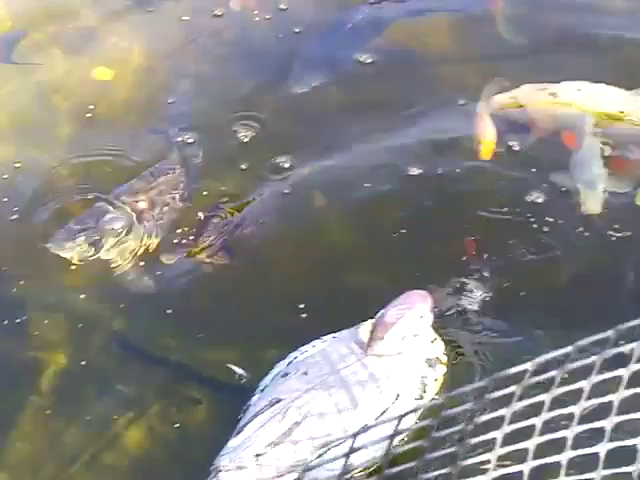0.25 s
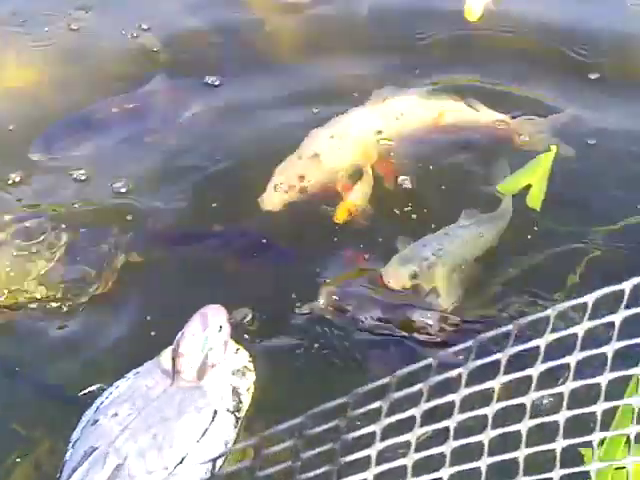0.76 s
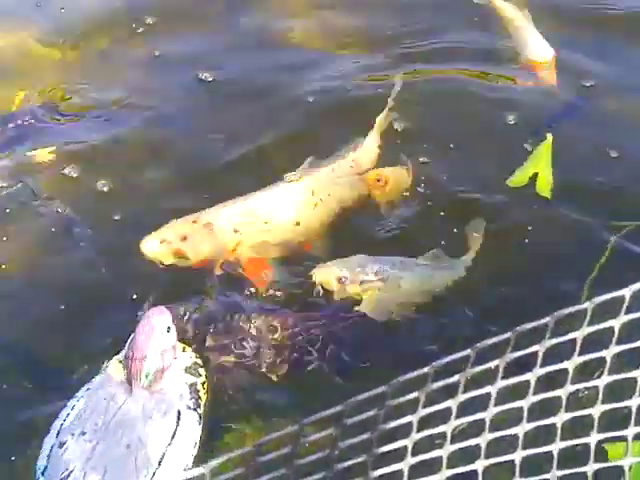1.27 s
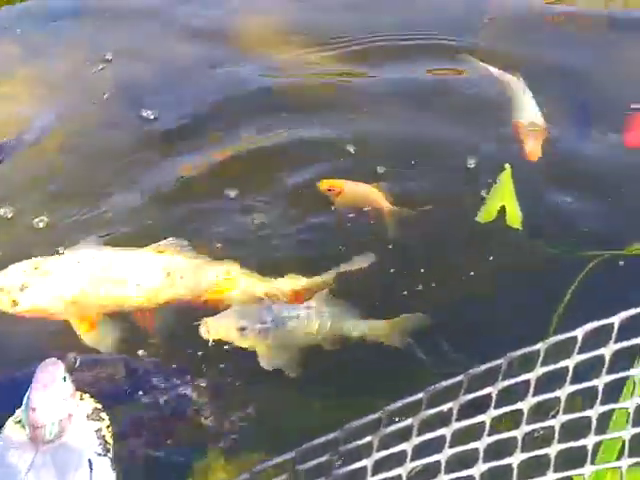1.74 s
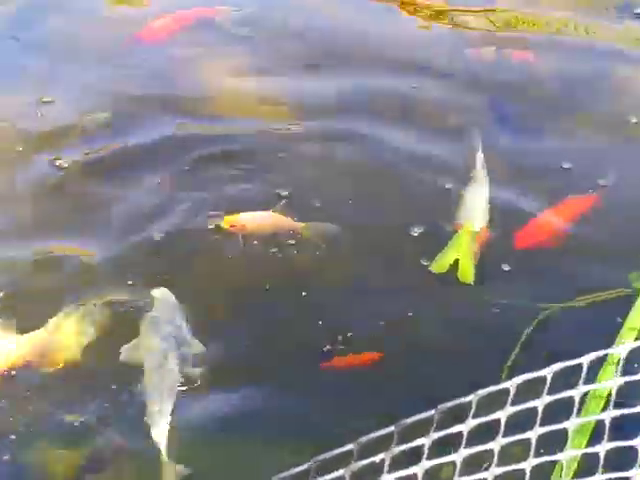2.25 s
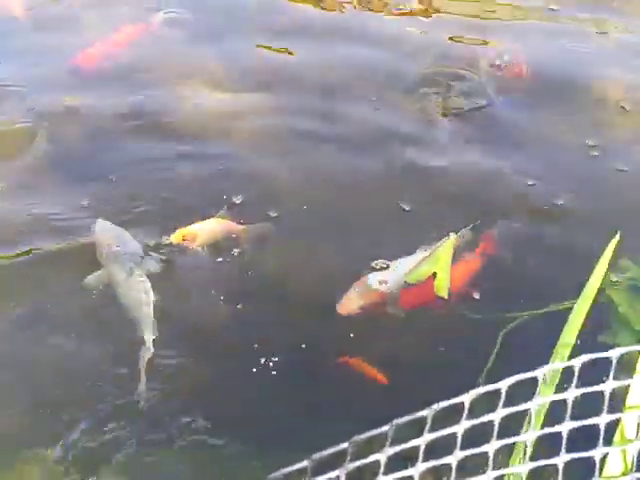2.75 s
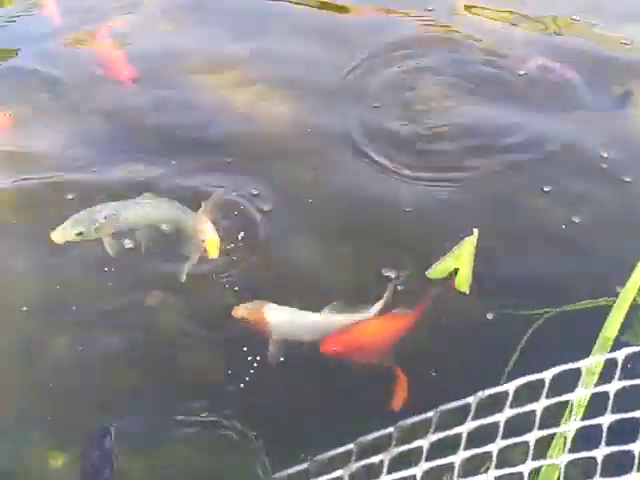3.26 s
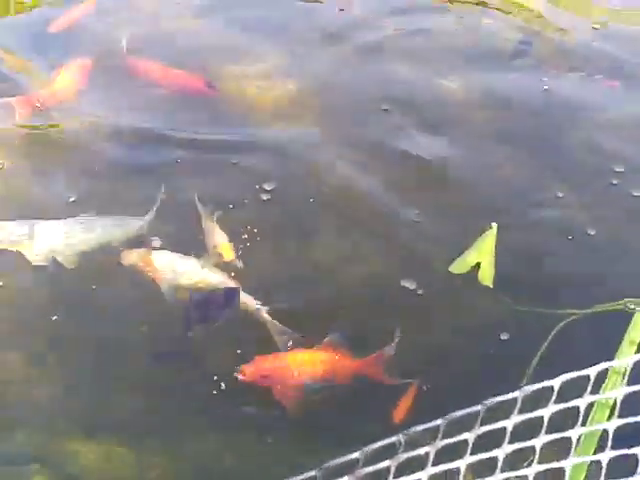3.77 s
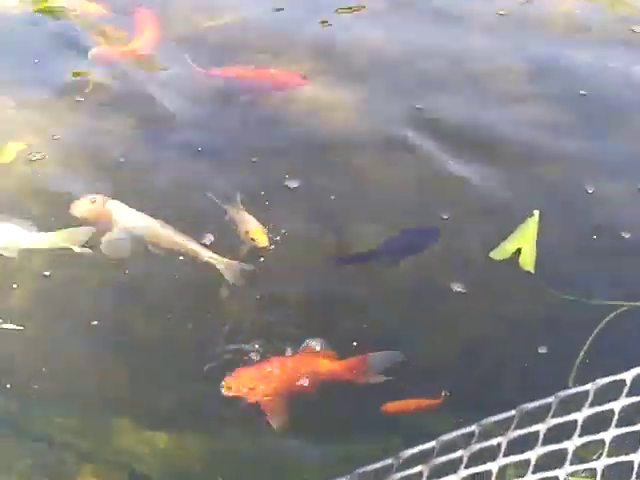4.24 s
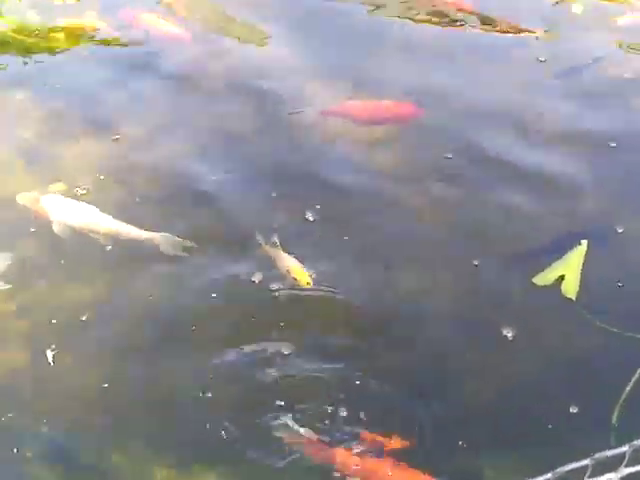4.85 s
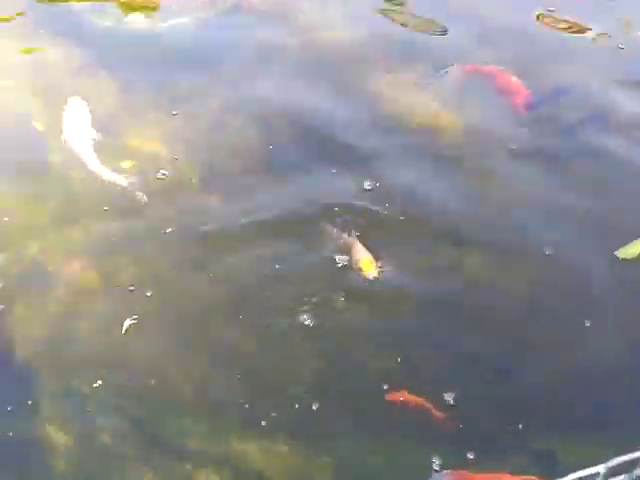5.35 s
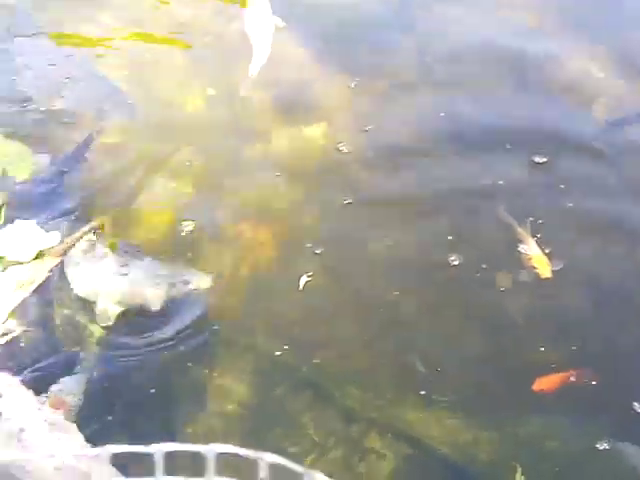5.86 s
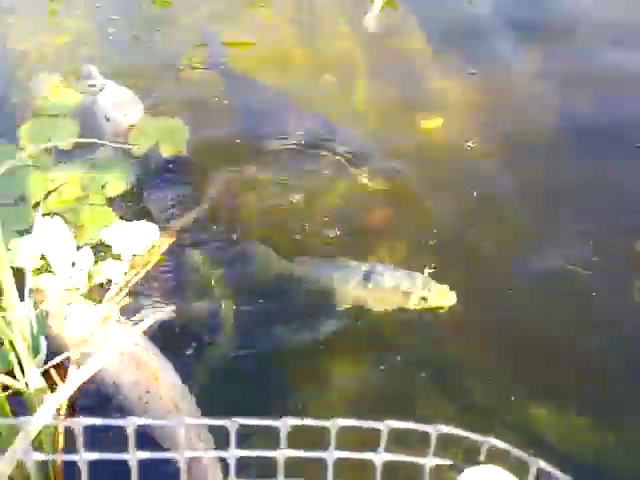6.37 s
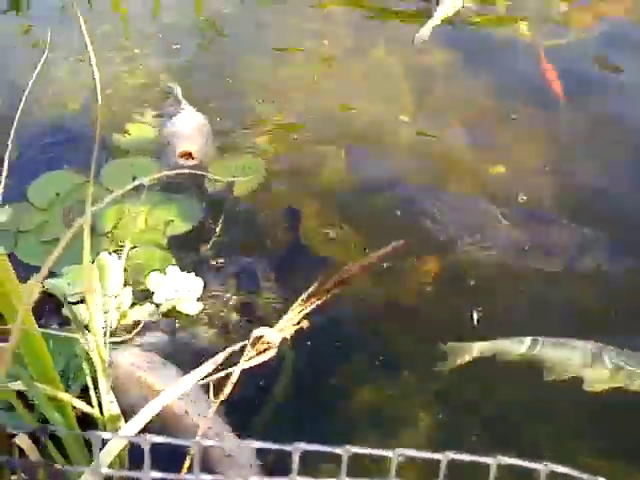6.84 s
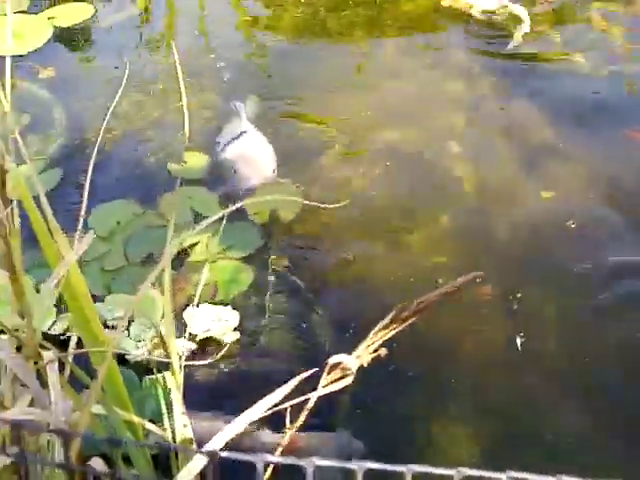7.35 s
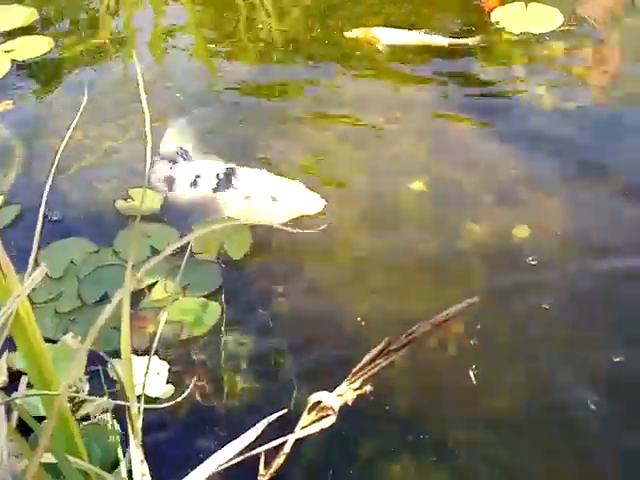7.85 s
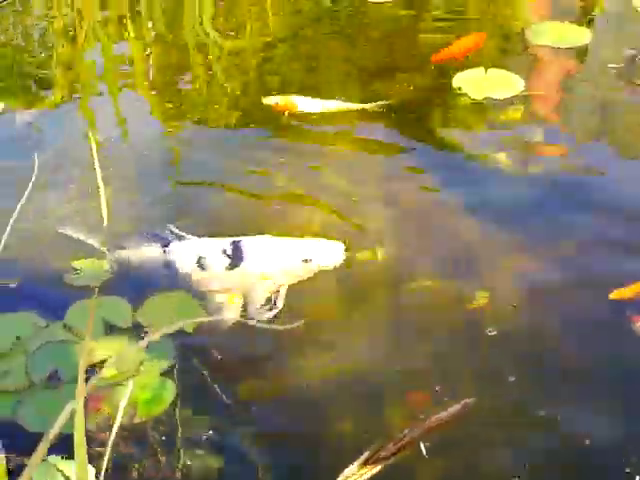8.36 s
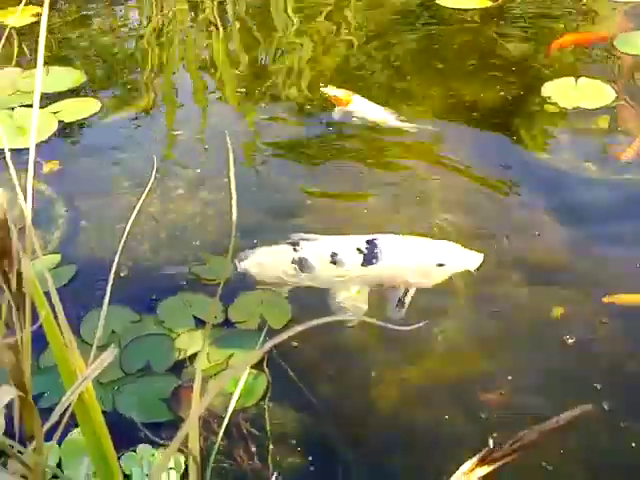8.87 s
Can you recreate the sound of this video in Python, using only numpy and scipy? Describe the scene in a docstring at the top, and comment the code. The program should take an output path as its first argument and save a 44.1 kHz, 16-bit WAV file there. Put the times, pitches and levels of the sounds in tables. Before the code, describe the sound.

Carp feed at a garden pond, heard close to a small, slightly ringing camera microphone. Faint drips come first, then a loud cluster of smacks and rising slurps, a few lone pops, a second gulping cluster, and one sharp, loud snap past the middle. A small bird twitters a little further off, clearer later, over soft air, lapping water and distant birds.

```python
"""A garden pond, with carp sucking at the surface close to a small camera microphone.
Nearest are the fish: noise bursts for lip smacks and a little plant rustle, climbing decaying sines for
air pockets and mouths snapping open, and short gliding tones over a gurgle for slurps, most of them upward.
Further off a small bird twitters in arched whistles and ticks. Behind lie shaped noise for air, breeze,
lapping water and distant birds, soft chirps, and wavering sines for a low pump hum and thin high whines."""
import sys
import numpy as np
from scipy import signal
from scipy.fft import rfft, irfft
from scipy.io import wavfile
from scipy.ndimage import uniform_filter1d

SR = 44100
rng = np.random.default_rng(int(sys.argv[2]) if len(sys.argv) > 2 else 0)


def log_audio(samples):
    """Write samples as a 16-bit WAV file to the path given in sys.argv[1]."""
    # one column per channel
    frames = np.atleast_2d(samples).T
    # limit to full scale, then quantise
    limited = np.clip(frames, -1, 1)
    pcm = np.round(limited * 32767).astype(np.int16)
    wavfile.write(sys.argv[1], SR, pcm)


N = 401751  # samples, about 9.1 s


def amp(db):
    """Turns decibels into gain."""
    return 10 ** (np.asarray(db) / 20)


def unit(x):
    """Scales a signal to rms 1."""
    return x / np.sqrt(np.mean(x ** 2) + 1e-20)


def read(points, hz):
    """Reads a curve of (pitch_hz, value) on a log-frequency axis."""
    f, value = np.transpose(points)
    return np.interp(np.log(hz + 1), np.log(f + 1), value)


def level(points):
    """Gain along the scene from a curve of (time_s, level_db)."""
    return amp(np.interp(np.arange(N) / SR, *np.transpose(points)))


def add(mix, s, sound):
    """Mixes a sound in at time s, cut at the end of the scene."""
    part = mix[max(round(s * SR), 0):][:len(sound)]
    part += sound[:len(part)]


def noise(points):
    """Steady noise of rms 1 with the given spectrum."""
    spectrum = rfft(rng.standard_normal(N))
    gain = amp(read(points, np.fft.rfftfreq(N, 1 / SR)))
    return unit(irfft(spectrum * gain, N))


def drift(per_s):
    """Slow random wandering of rms 1, with per_s new values a second joined by straight lines."""
    knots = rng.standard_normal(4000)
    return unit(np.interp(np.arange(N) / SR * per_s, np.arange(len(knots)), knots))


def uneven(x, depth_db, size=512):
    """Lets small regions of time and pitch swell and fade on their own."""
    z = signal.stft(x, SR, nperseg=size)[2]
    field = uniform_filter1d(rng.standard_normal(z.shape), size=3, axis=0)  # across pitch
    field = uniform_filter1d(field, size=5, axis=1)  # across time
    return unit(signal.istft(z * amp(depth_db * unit(field)), SR, nperseg=size)[1][:N])


def colour(x, points, size=2048):
    """Causal minimum-phase filter: its resonances ring on after each click."""
    cepstrum = irfft(np.log(amp(read(points, np.fft.rfftfreq(size, 1 / SR)))))
    # folding the cepstrum forward puts all the ringing after the click
    cepstrum[1:size // 2] *= 2
    cepstrum[size // 2 + 1:] = 0
    response = irfft(np.exp(rfft(cepstrum)))
    return signal.oaconvolve(x, response)[:N]


# tone of the garden's echoes as they start: pitch_hz, relative level_db
ECHO_TONE = [(100, 3), (300, 4.5), (900, 2), (2500, -1.5), (6000, -0.5), (14000, -2)]
# time for the echoes to fall 60 dB, before the stretch for each source: pitch_hz, decay_s
ECHO_DECAY = [(300, 0.19), (800, 0.14), (2500, 0.15), (6000, 0.13), (14000, 0.033)]


def garden(x, stretch, delay=.006, size=256):
    """Scattered echoes from the bank, plants and fence, each band dying at its own speed."""
    taps = rng.standard_normal(SR // 2) * (rng.random(SR // 2) < .08)  # sparse reflections
    hz, t, z = signal.stft(taps, SR, nperseg=size)
    fall_db = 60 * t / (stretch * read(ECHO_DECAY, hz)[:, None])
    z = z * amp(read(ECHO_TONE, hz)[:, None] - fall_db)
    tail = np.r_[np.zeros(int(delay * SR)), signal.istft(z, SR, nperseg=size)[1]]
    return signal.oaconvolve(x, tail / np.linalg.norm(tail))[:N]


# a low pump hum and thin high whines: centre pitch_hz, mean level_db
HUM_AND_WHINES = [(85, -87.5), (6718, -87.5), (15385, -100), (15601, -100)]


def hum_and_whines(waver_hz=2.5, throb_db=4.0):
    """A low pump hum and thin high whines: sines that each waver in pitch and level."""
    out = np.zeros(N)
    for hz, db in HUM_AND_WHINES:
        pitch = hz + waver_hz * drift(7.9)
        tone = unit(np.sin(2 * np.pi * np.cumsum(pitch) / SR))
        out += amp(db + throb_db * drift(6.9)) * tone
    return out


# spectrum of the open air: pitch_hz, relative level_db
AIR_SPECTRUM = [(15, -33), (30, -20), (65, 1), (95, 1.5), (160, -3.5), (300, -7.5), (520, -10.5),
                (900, -14), (1700, -14.5), (3500, -24), (7000, -19), (15000, -30.5)]


def outdoor_air(level_db=-70):
    """The still air around the pond: soft, uneven noise that barely drifts in level."""
    return amp(level_db + .5 * drift(3.3)) * uneven(noise(AIR_SPECTRUM), depth_db=3.0)


# spectrum of the breeze: pitch_hz, relative level_db
BREEZE_SPECTRUM = [(20, -39.5), (60, 0), (110, -2.5), (200, -10.5), (600, -38.5)]


def breeze(level_db=-82):
    """A weak breeze: low noise with a quickly drifting level."""
    return amp(level_db + 1.6 * drift(15)) * noise(BREEZE_SPECTRUM)


# spectrum of water at the bank: pitch_hz, relative level_db
LAPPING_SPECTRUM = [(90, -23.5), (170, -5.5), (240, 1), (305, 7.5), (380, -10.5), (550, -15), (1000, -33),
                    (2000, -51.5)]
# how the lapping comes and goes, before its trim: time_s, level_db
LAPPING_CURVE = [(0.0, -84), (0.23, -85), (0.94, -72.5), (1.12, -77), (2.06, -73.5), (2.49, -66),
                 (2.86, -75.5), (3.35, -76), (3.73, -85), (4.39, -86.5), (4.72, -69), (4.87, -82),
                 (6.17, -73), (6.27, -72), (6.47, -78), (7.28, -77), (7.89, -82), (9.11, -82)]


def lapping(trim_db=2):
    """Water lapping at the bank: low, uneven noise that swells and sinks."""
    return amp(trim_db) * level(LAPPING_CURVE) * uneven(noise(LAPPING_SPECTRUM), depth_db=2.0)


# spectrum of the distant birds: pitch_hz, relative level_db
TWITTER_SPECTRUM = [(1700, -28), (2130, -6.5), (2270, -8.5), (2420, 3.5), (2660, -2.5), (2800, 0.5),
                    (3100, -9), (3700, -28)]
# how the far twitter comes and goes, before its trim and drift: time_s, level_db
TWITTER_CURVE = [(0.0, -79), (0.33, -68), (1.34, -76.5), (1.9, -68), (2.97, -71.5), (3.17, -62.5),
                 (3.83, -75.5), (4.23, -73.5), (4.94, -65), (5.07, -69.5), (6.04, -72), (6.32, -65.5),
                 (7.08, -76), (7.76, -64), (8.14, -73), (8.5, -64), (8.8, -77), (9.11, -71)]


def distant_birds(trim_db=-7):
    """Birds too far off to tell apart: very uneven noise in their band."""
    blur = uneven(noise(TWITTER_SPECTRUM), depth_db=7.0)
    return amp(trim_db + 0.87 * drift(8)) * level(TWITTER_CURVE) * blur


def whistle(length, db, pitches):
    """One thin note bending through a few pitches, with a slight quaver and soft ends."""
    u = np.linspace(0, 1, int(length * SR))
    # a polynomial passes smoothly through every pitch
    bend = np.polyfit(np.linspace(0, 1, len(pitches)), pitches, len(pitches) - 1)
    quaver = unit(uniform_filter1d(rng.standard_normal(len(u)), size=70))
    hz = np.polyval(bend, u) * (1 + 0.014 * quaver)
    return amp(db) * signal.windows.tukey(len(u), .5) * np.sin(2 * np.pi * np.cumsum(hz) / SR)


# how the soft chirps come and go, before their trim: time_s, level_db
CHIRPS_CURVE = [(0.0, -78), (1.04, -83.5), (1.93, -79), (2.46, -73), (2.71, -81), (6.06, -79.5),
                (6.34, -73), (6.65, -81), (7.15, -75.5), (7.54, -71), (8.02, -77.5), (8.6, -73.5),
                (8.7, -73), (9.11, -93)]


def chatter(trim_db=-2.0, low_hz=3000, high_hz=6300, bend=0.11, spread_db=9, count=750):
    """A tangle of soft, quick chirps between the clear notes, blurred by distance."""
    out = np.zeros(N)
    for k, (when, length, weak, height, *turns) in enumerate(rng.random((count, 7))):
        middle_hz = low_hz * (high_hz / low_hz) ** height
        pitches = middle_hz * (1 + bend * (2 * np.array(turns) - 1))
        s = (k + when) / count * N / SR  # one chirp in each equal slot
        add(out, s, whistle(.006 + 0.04 * length, -spread_db * weak, pitches))
    blurred = unit(out + amp(-2.5) * garden(out, stretch=1.6))
    return amp(trim_db) * level(CHIRPS_CURVE) * blurred


def background():
    """Air, breeze, lapping water, distant birds and soft chirps together."""
    return outdoor_air() + breeze() + lapping() + distant_birds() + chatter()


CLIMB_OCTAVES_PER_S, DROP_OCTAVES_PER_S = 18, 12
TURN_S = 0.00592  # how widely the top of a note is rounded


def arch(length, top_hz, turn, count=7):
    """Pitches along a note: a climb, a rounded top, a drop."""
    t = (np.linspace(0, 1, count) - turn) * length
    speed = np.where(t < 0, CLIMB_OCTAVES_PER_S, DROP_OCTAVES_PER_S)
    return top_hz * 2 ** (-speed * (np.hypot(t, TURN_S) - TURN_S))


CHIP_S, CHIP_GLIDE_OCTAVES = 0.0094, -0.082


def chip(db, hz):
    """A very short, slightly falling tick of the song."""
    return whistle(CHIP_S, db, hz * 2 ** (CHIP_GLIDE_OCTAVES * np.array([-.5, .5])))


# slurred notes of the bird: start_s, length_s, level_db, top pitch_hz, share of the note before the top
BIRD_NOTES = [ (1.996, .04, -66.5, 4650, .5), (2.112, 0.034, -66.5, 4600, 0.41),
              (3.068, 0.038, -66, 4550, .5), (3.391, 0.047, -67, 4080, 0.55),
              (4.119, 0.057, -64.5, 4250, 0.61), (4.745, 0.042, -66.5, 4460, 0.25),
              (4.865, 0.046, -64, 3980, .3), (4.933, .035, -66, 4920, 0.42),
              (5.106, 0.056, -63.5, 3860, 0.64), (5.356, 0.059, -63, 3570, 0.36),
              (5.418, .035, -57.5, 4780, .35), (5.576, 0.046, -57.5, 4600, 0.82),
              (5.618, .02, -59, 5440, .5), (5.996, 0.058, -64.5, 3330, 0.27),
              (6.056, 0.039, -53.5, 4480, 0.65), (6.23, 0.048, -58.5, 3900, 0.344),
              (6.278, 0.036, -52.5, 4420, 0.39), (6.377, 0.034, -53.5, 4470, 0.46),
              (6.412, 0.049, -51.5, 4690, 0.86), (7.174, 0.056, -65.5, 4800, 0.45),
              (7.449, 0.023, -51.5, 4500, 0.71), (8.367, .027, -56.5, 3920, 0.53),
              (8.589, 0.055, -65.5, 4230, 0.73), (9.075, 0.029, -58, 5770, 0.075)]
# sharp ticks of the song: start_s, level_db, middle pitch_hz
BIRD_TICKS = [(7.295, -48.5, 6360), (7.342, -55, 5620), (7.392, -57.5, 3470), (7.636, -58, 6500),
              (7.817, -57, 5020), (8.061, -51, 6400), (8.059, -55, 4670), (8.226, -55, 5180),
              (8.228, -54, 4240), (8.228, -61, 6650), (8.579, -47, 6140)]
# fluttering runs of faint ticks: start_s, length_s, highest level_db
TICK_FLURRIES = [(7.291, 0.18, -55), (7.602, 0.24, -62), (8.332, 0.073, -60.5), (8.449, .2, -62.5)]


def bird(low_hz=3300, high_hz=6600, spread_db=16, count=20):
    """A small bird's quick twitter: arched whistles, sharp ticks and flurries of fainter ones."""
    out = np.zeros(N)
    for s, length, db, top_hz, turn in BIRD_NOTES:
        add(out, s, whistle(length, db, arch(length, top_hz, turn)))
    for s, db, hz in BIRD_TICKS:
        add(out, s, chip(db, hz))
    for s, length, db in TICK_FLURRIES:
        for when, height, weak in rng.random((count, 3)):
            hz = low_hz * (high_hz / low_hz) ** height
            add(out, s + when * length, chip(db - spread_db * weak, hz))
    return out


def bubble(db, hz, rise, swell, decay):
    """An air pocket rings and climbs in pitch as it shrinks or nears the surface."""
    t = np.arange(0, 2 * swell + 7 * decay, 1 / SR)
    pitch = hz * 2 ** np.clip(rise * t, -1, 1)  # rise in octaves per s, at most one octave
    shape = (1 - np.exp(-(t / swell) ** 2)) * np.exp(-t / decay)
    return amp(db) * shape / shape.max() * np.sin(2 * np.pi * np.cumsum(pitch) / SR)


# fish stirring the surface: start_s, length_s, highest level_db of the droplets and small bubbles
SURFACE_STIRS = [(0.819, 0.51, -66.5), (1.679, .13, -63.5), (2.295, .043, -49.5), (2.433, 0.072, -56.5),
                 (2.52, 0.19, -56), (2.721, 0.31, -60.5), (4.365, 0.17, -64), (6.389, 0.091, -56.5),
                 (6.5, 0.16, -61.5), (8.312, 0.16, -75)]


def ripples(level_db=-69, spread_db=14, low_hz=420, high_hz=9000, cycles=7.8, tilt_db=-3, count=30):
    """Tiny bubbles burst in clusters where fish stir the water, and sparsely all over the pond."""
    out = np.zeros(N)
    calm = [(s, 1, level_db) for s in range(N // SR)]  # one sparse scatter each second
    for s, length, db in SURFACE_STIRS + calm:
        for when, small, weak in rng.random((count, 3)):
            hz = low_hz * (high_hz / low_hz) ** small
            bubble_db = db + tilt_db * small - spread_db * weak
            add(out, s + when * length, bubble(bubble_db, hz, 6.9, 1 / hz, cycles / hz))
    return out


# sucks of water close by: start_s, length_s, peak level_db of the tone, first pitch_hz,
# glide in octaves per s (negative falls)
WATER_SUCKS = [(0.105, 0.048, -60, 770, 24.5), (0.927, 0.063, -52, 486, 11),
               (2.2968, 0.005, -18, 2996, -71), (2.434, 0.033, -36, 547, 17), (2.457, .082, -38, 800, 19),
               (3.743, 0.049, -50, 834, 15), (4.448, 0.03, -45.5, 730, 35), (5.741, 0.036, -54.5, 1215, 13),
               (5.76, 0.019, -43, 1920, 28)]
SLURP_SKEW, SLURP_TAPER = 0.45, 2  # the suck peaks early and tapers away
GURGLE_HZ, GURGLE_DB_PER_OCTAVE = 560, -14.5  # a wide, low cavity gurgles most


def slurps(gurgle_db=-12, flutter=.18):
    """Water rushes into an open mouth: a gliding cavity whistle, mostly upward, over a low gurgle."""
    out = np.zeros(N)
    gurgle = amp(gurgle_db) * noise([(120, -56), (280, 18), (600, 6.5), (1200, -1.5), (3000, -49)])
    flow = 1 + flutter * drift(350)
    for s, length, db, hz, rise in WATER_SUCKS:
        t = np.arange(0, length, 1 / SR)
        now = round(s * SR) + np.arange(len(t))
        shape = abs(np.sin(np.pi * (t / length) ** SLURP_SKEW)) ** SLURP_TAPER
        tone = np.sin(2 * np.pi * np.cumsum(hz * 2 ** (rise * t)) / SR)
        gurgle_gain = amp(GURGLE_DB_PER_OCTAVE * np.log2(hz / GURGLE_HZ))
        add(out, s, amp(db) * shape * (flow[now] * tone + gurgle_gain * gurgle[now]))
    return out


# a pocket climbs this far in one decay time, and swells in this share of it
RISE_OCTAVES, SWELL_SHARE = 0.078, 0.12


def plop(db, hz, decay):
    """A pocket at the surface: the sooner it dies, the faster it swells and climbs."""
    return bubble(db, hz, RISE_OCTAVES / decay, SWELL_SHARE * decay, decay)


def noise_burst(db, decay, low_hz, high_hz, grain_db=4.5, swell=0.24, size=6000):
    """A quick cluster of tiny clicks, as when a water film tears from the lips or a plant rustles."""
    t = np.arange(size) / SR
    clicks, clumps = rng.standard_normal((2, size))
    shape = (1 - np.exp(-t / (swell * decay))) * np.exp(-t / decay)
    grain = amp(grain_db * unit(uniform_filter1d(clumps, size=24)))  # uneven clumps of clicks
    clicks = clicks * shape * grain
    clicks = signal.lfilter(*signal.butter(4, min(high_hz, .45 * SR), fs=SR), clicks)
    clicks = signal.lfilter(*signal.butter(3, low_hz, "high", fs=SR), clicks)
    # the level is set where the envelope is highest
    return amp(db) * unit(clicks) * np.sqrt(np.mean(shape ** 2)) / shape.max()


# mouths snapping open: start_s, level_db before the mode gains, lowest starting pitch_hz,
# decay_s of the lowest mode
MOUTH_SNAPS = [(2.2923, -38, 363, 0.0064), (2.777, -46.5, 1116, 0.011), (4.363, -47, 827, 0.0076),
               (5.7632, -36, 1480, .003), (6.1872, -23.5, 577, 0.0041)]
# modes of the open mouth: multiple of the lowest pitch, gain_db
MOUTH_MODES = [(1, 0.5), (1.58, 0.5), (2.6, -4.5)]
# soft flesh swallows the high modes: pitch_hz, gain_db
FLESH_LOSS = [(2300, -0.5), (3400, -44)]
# the spatter after every gulp, its level relative to the gulp
SPRAY_DB, SPRAY_LAG_S, SPRAY_DECAY_S, SPRAY_LOW_HZ, SPRAY_HIGH_HZ = -26, 0.0065, 0.011, 500, 3600


def gulps():
    """A mouth snaps open: its cavity rings, higher modes more briefly, and spatter falls back."""
    out = np.zeros(N)
    for s, db, hz, decay in MOUTH_SNAPS:
        for multiple, mode_db in MOUTH_MODES:
            mode_hz = hz * multiple
            ring_db = db + mode_db + read(FLESH_LOSS, mode_hz)
            add(out, s, plop(ring_db, mode_hz, decay / np.sqrt(multiple)))
        spray_low_hz = max(hz, SPRAY_LOW_HZ)
        spray = noise_burst(db + SPRAY_DB, SPRAY_DECAY_S, spray_low_hz, SPRAY_HIGH_HZ, grain_db=3.5)
        add(out, s + SPRAY_LAG_S, spray)
    return out


# air pockets popping close by: start_s, peak level_db, starting pitch_hz, decay_s
AIR_POCKETS = [ (.825, -57, 476, .0075), (.834, -55.5, 6800, 0.0032), (.910, -56.5, 2670, 0.0042),
               (1.286, -52.5, 985, 0.0026), (1.62, -48.5, 1710, 0.0029), (1.699, -37, 956, 0.005),
               (2.209, -52, 3830, 0.0043), (2.383, -42.5, 495, 0.027), (2.4154, -34.5, 1776, 0.0029),
               (2.433, -33.5, 556, 0.0064), (2.4587, -28, 760, 0.0039), (2.520, -51, 900, 0.011),
               (2.578, -45, 4950, 0.0032), (2.787, -56.5, 7240, 0.0034), (2.876, -49.5, 8350, .0025),
               (2.901, -40.5, 597, 0.0049), (4.089, -47, 2203, 0.0068), (4.184, -49, 8940, 0.0018),
               (4.248, -50.5, 3250, 0.002), (4.3787, -28, 1396, .0026), (4.431, -34.5, 3700, 0.0048),
               (4.438, -34, 1370, 0.0055), (4.444, -40.5, 1800, 0.0065), (4.795, -60.5, 195, .025),
               (4.829, -58, 2450, .004), (5.085, -47, 1790, 0.0067), (5.398, -48.5, 580, .0079),
               (5.813, -47.5, 4870, .0027), (6.1868, -28.5, 2874, 0.0026), (6.1873, -23, 6750, 0.0022),
               (6.429, -49, 570, 0.014), (6.543, -56, 1980, .003), (6.461, -46.5, 480, 0.0044),
               (8.016, -55, 772, 0.0063), (8.33, -59.5, 1310, 0.0092), (8.364, -54.5, 2460, 0.0089),
               (8.385, -47, 2505, .009), (8.425, -61, 746, .009), (9.083, -51.5, 2190, 0.004)]
# short noise bursts, wet lip smacks and a little plant rustle:
# start_s, level_db at the height of the burst, decay_s, lowest edge_hz, highest edge_hz
SMACKS_AND_RUSTLES = [ (1.276, -62, .006, 6000, 11100), (1.6995, -47.5, 0.0017, 700, 6600),
                      (2.2907, -40, 0.0094, 4000, 12900), (2.291, -33, 0.0089, 300, 2370),
                      (2.298, -30, 0.0017, 2500, 12700), (2.3832, -56, .001, 700, 3200),
                      (2.412, -44, 0.0029, 3240, 4930), (2.4148, -31, 0.00064, 6340, 14200),
                      (2.4607, -43, 0.0013, 1980, 3780), (2.901, -43, 0.0012, 444, 1300),
                      (4.3649, -53.5, .0067, 900, 4200), (4.3776, -38.5, 0.0029, 885, 2760),
                      (4.438, -45.5, 0.0049, 3730, 9500), (4.388, -57, .017, 1200, 3470),
                      (5.552, -64, 0.013, 3000, 5500), (5.812, -60, .003, 4500, 11000),
                      (6.1816, -50, 0.003, 600, 3520), (6.188, -27.5, 0.0011, 3470, 5240),
                      (6.186, -43.5, 0.0044, 6500, 14200), (6.1874, -29.5, 0.0043, 417, 3800),
                      (6.1975, -36.5, .002, 500, 4190), (6.613, -64, 0.012, 500, 6940),
                      (6.849, -61, .004, 4330, 5600), (6.885, -64.5, 0.014, 3000, 6500),
                      (6.974, -57, 0.011, 2900, 7050), (8.394, -48, 0.0053, 1620, 3680)]


def feeding():
    """The nearest fish: pops, smacks, gulps and slurps, with a little plant rustle."""
    out = np.zeros(N)
    for s, *pocket in AIR_POCKETS:
        add(out, s, plop(*pocket))
    for s, *burst in SMACKS_AND_RUSTLES:
        add(out, s, noise_burst(*burst))
    return out + gulps() + slurps()


def scene():
    """Near fish are almost dry; the bird is further off and wetter."""
    water, song = feeding() + ripples(), bird()
    water = water + amp(-16) * garden(water, stretch=0.95)
    song = song + amp(-7.5) * garden(song, stretch=1.3)
    return (water + song + background() + hum_and_whines())[None]


# response of the small camera microphone: pitch_hz, gain_db
MICROPHONE_RESPONSE = [(1800, -0.5), (2150, 6.5), (2430, 9.5), (2800, 7.5), (3400, 2.5), (5000, -1.5),
                       (5900, -4), (6850, 1.5), (8000, -8.5), (10500, -4), (13300, -8), (15200, 6.5)]
EDGE_HZ = 15900  # upper band limit


def record(dry):
    """The small microphone port rings in the treble; then a steep low-pass limits the band."""
    heard = colour(dry[0], MICROPHONE_RESPONSE)
    band_limit = signal.firwin(511, EDGE_HZ, window=("kaiser", 9), fs=SR)
    return signal.oaconvolve(heard, band_limit, "same")[None]


dry = scene()
out = record(dry)
log_audio(out)
```